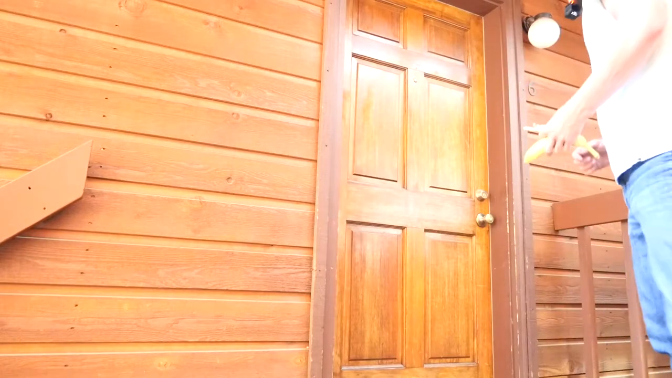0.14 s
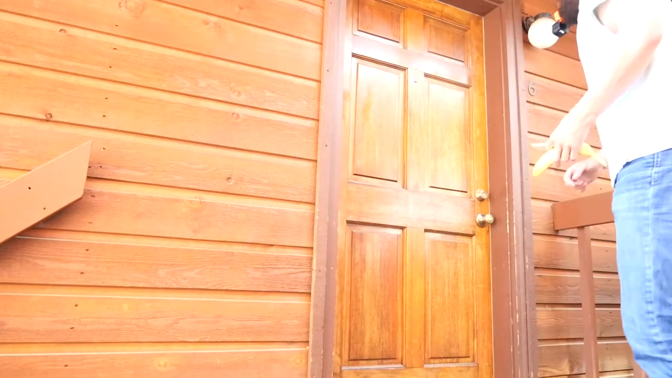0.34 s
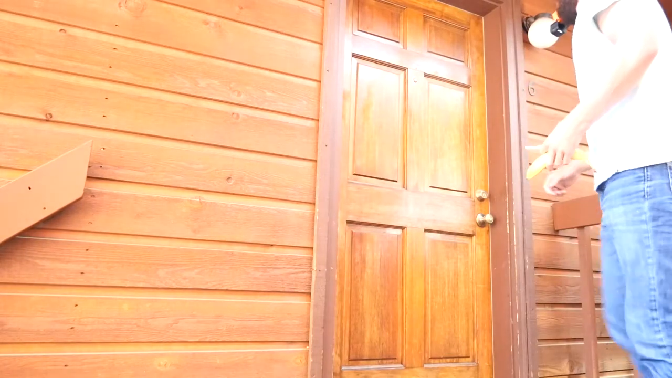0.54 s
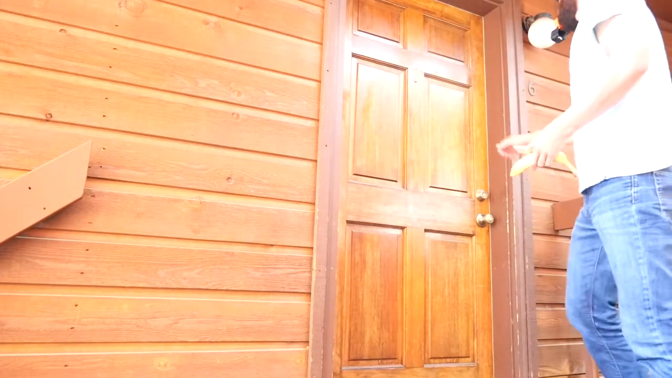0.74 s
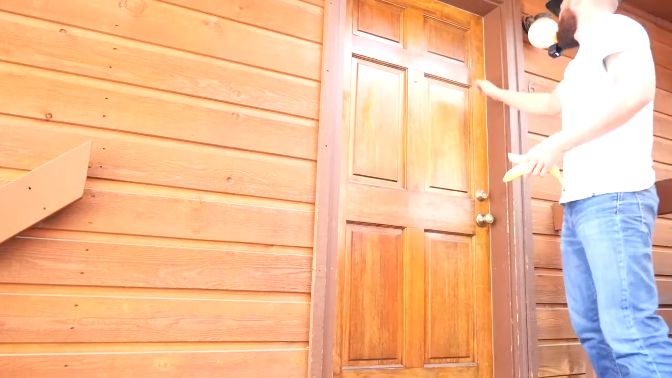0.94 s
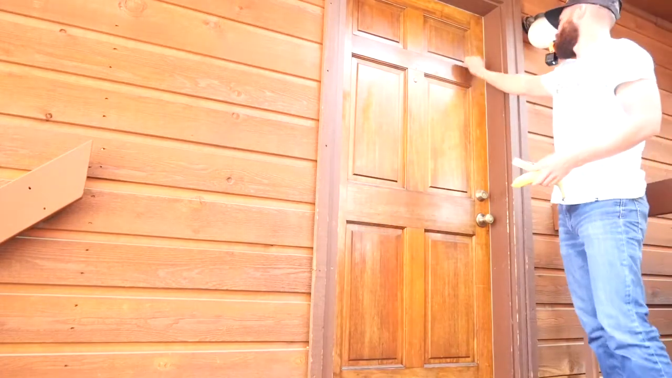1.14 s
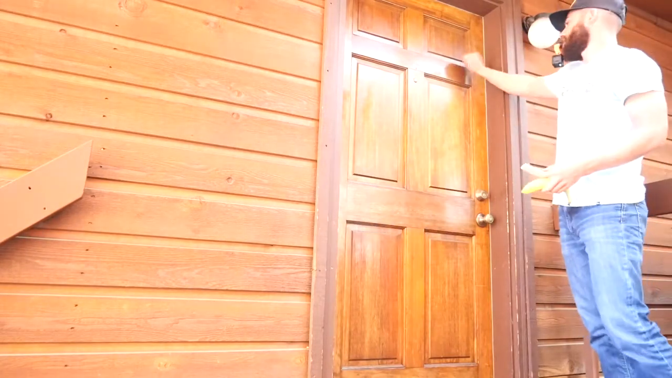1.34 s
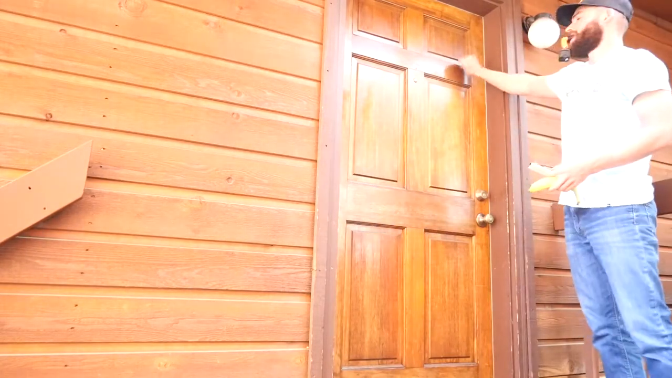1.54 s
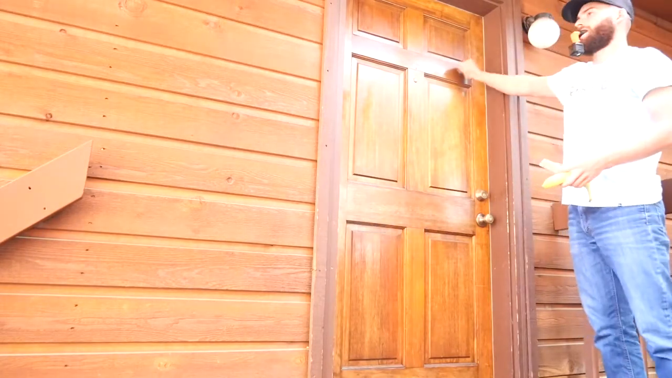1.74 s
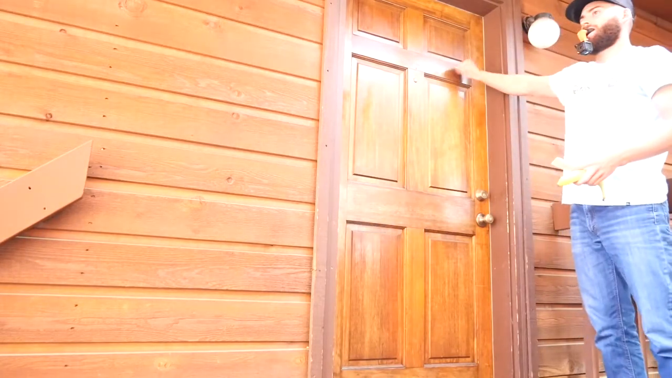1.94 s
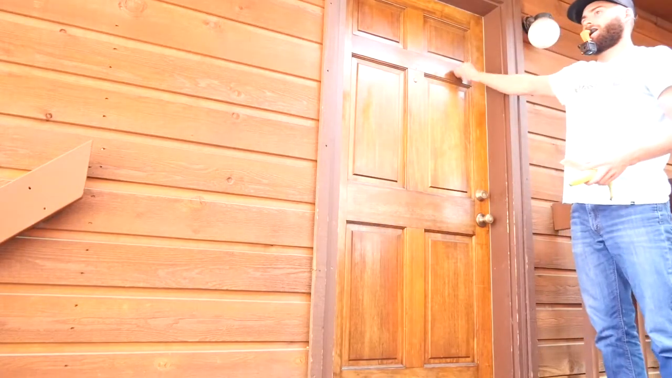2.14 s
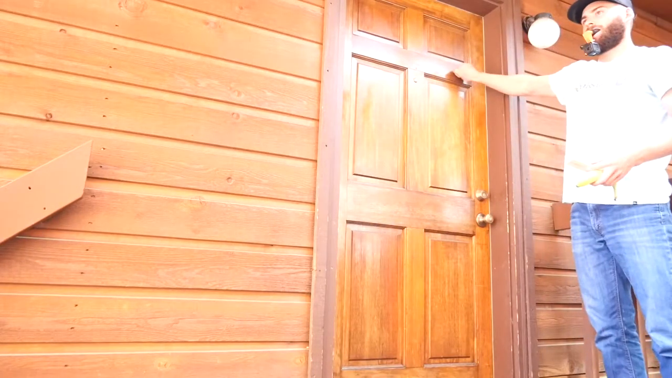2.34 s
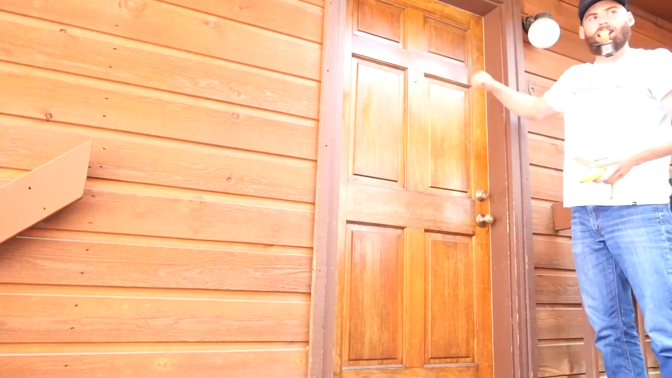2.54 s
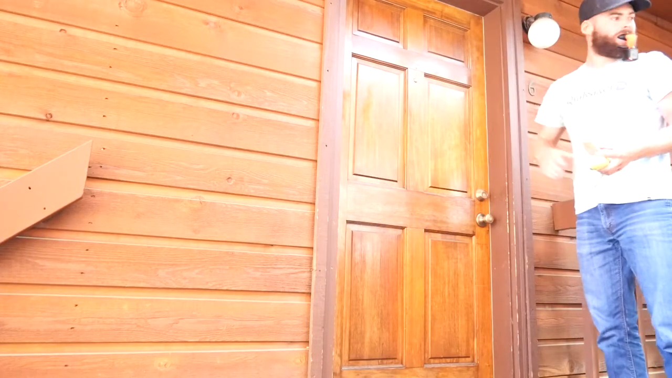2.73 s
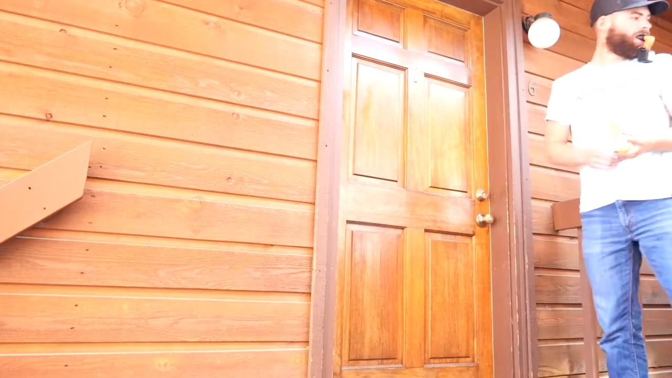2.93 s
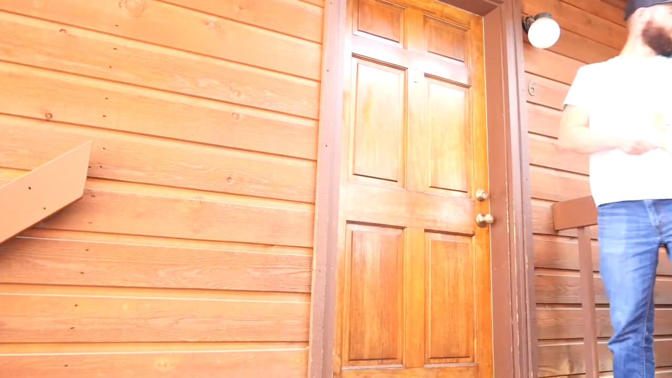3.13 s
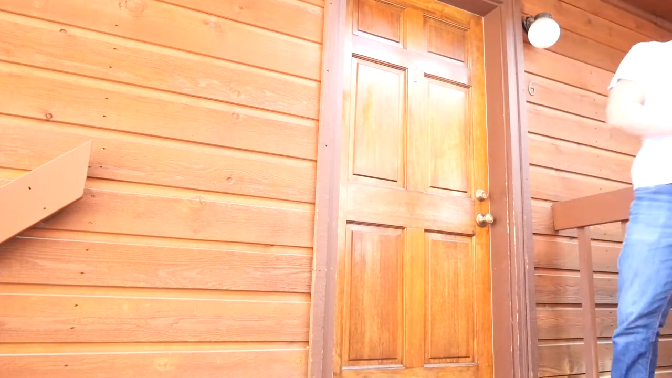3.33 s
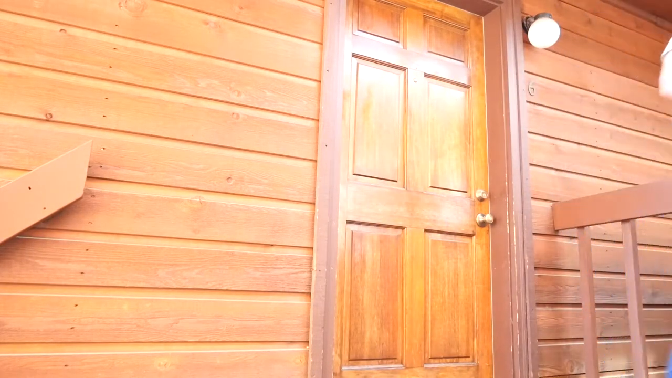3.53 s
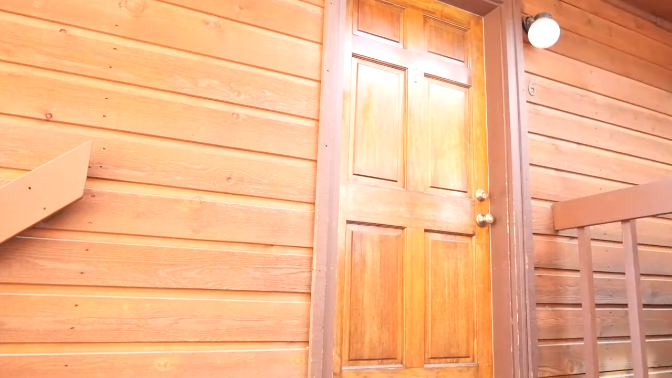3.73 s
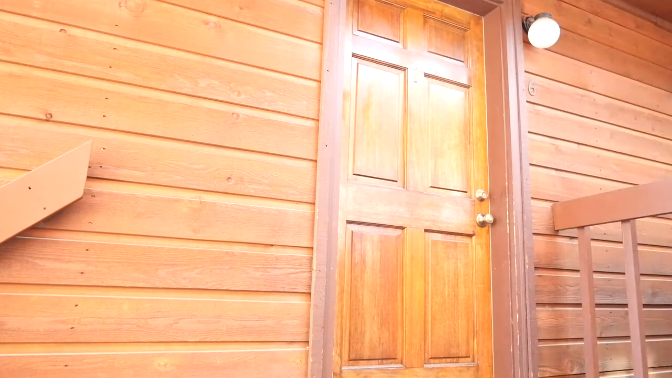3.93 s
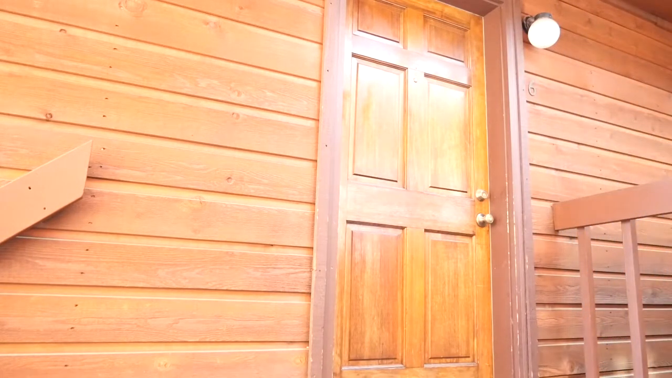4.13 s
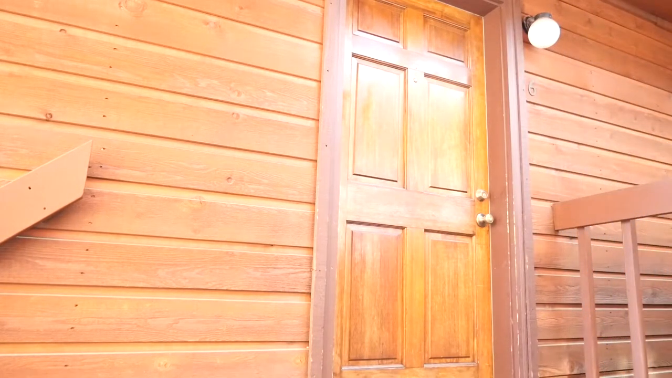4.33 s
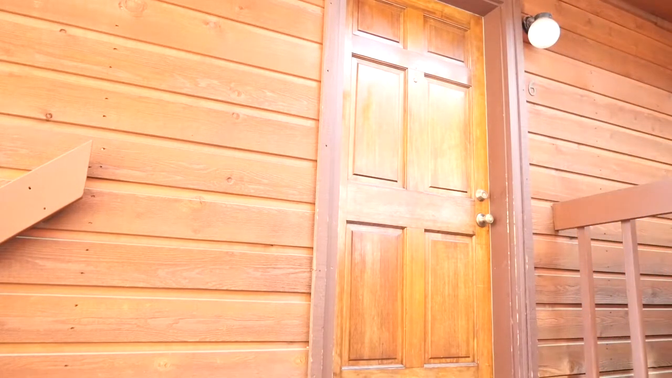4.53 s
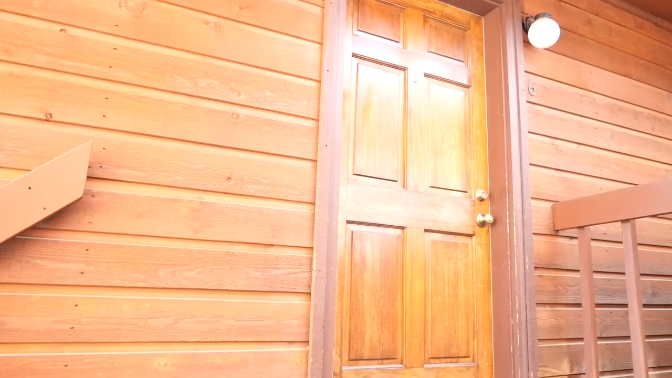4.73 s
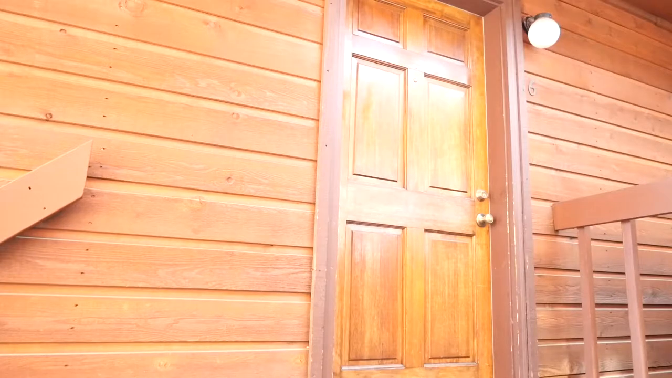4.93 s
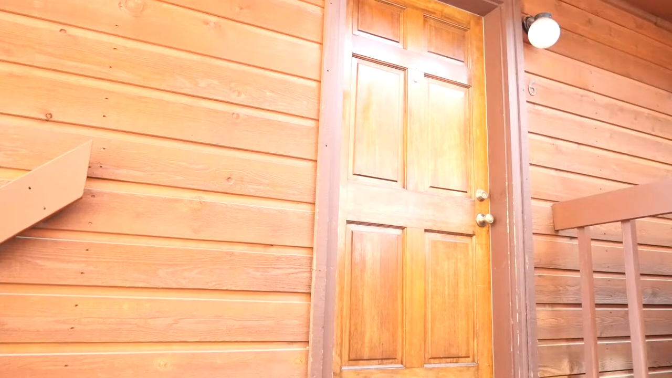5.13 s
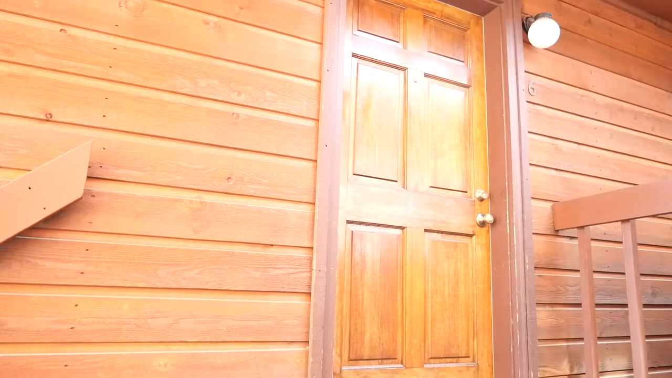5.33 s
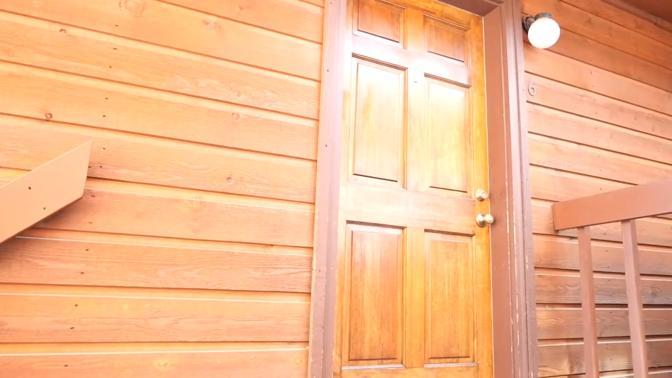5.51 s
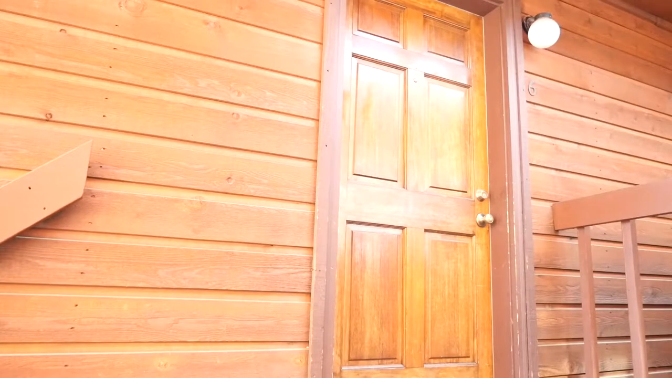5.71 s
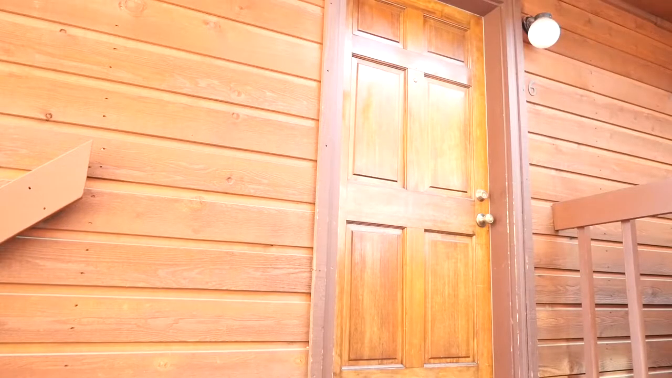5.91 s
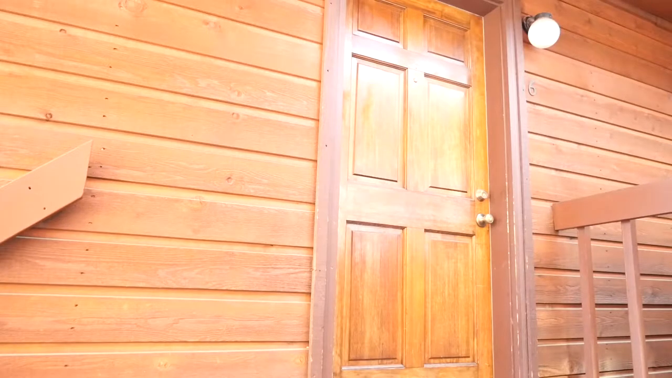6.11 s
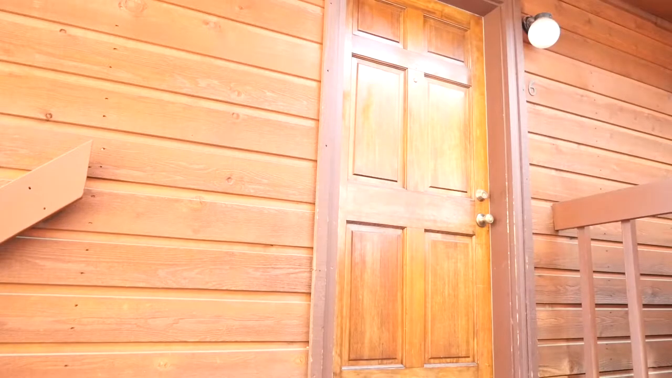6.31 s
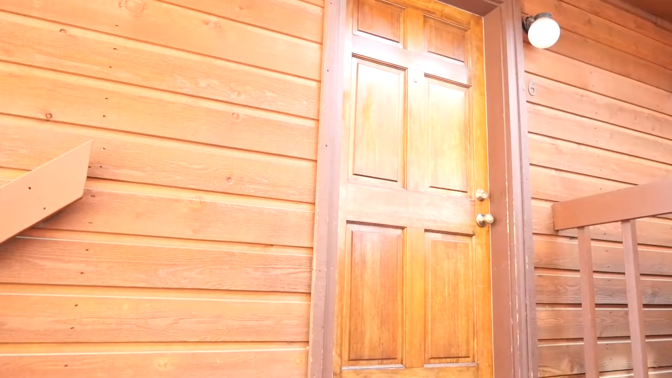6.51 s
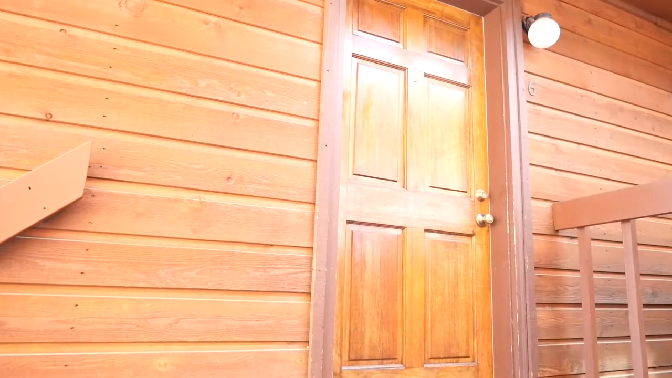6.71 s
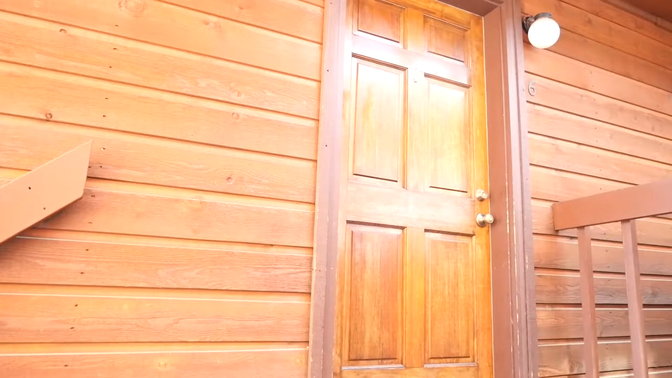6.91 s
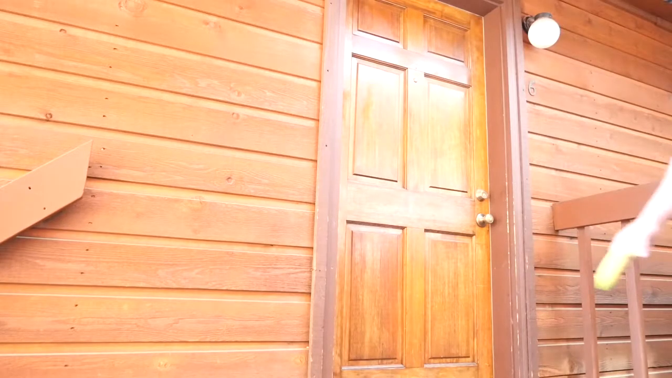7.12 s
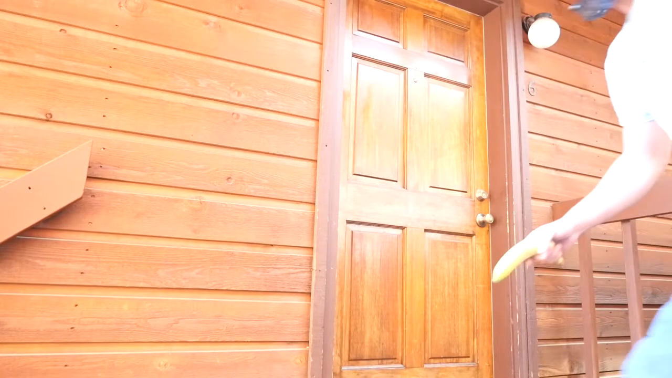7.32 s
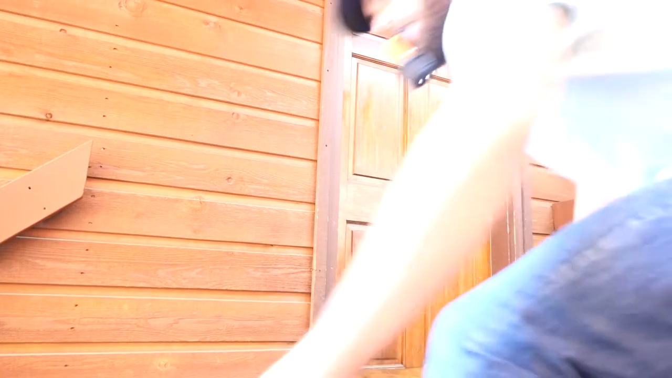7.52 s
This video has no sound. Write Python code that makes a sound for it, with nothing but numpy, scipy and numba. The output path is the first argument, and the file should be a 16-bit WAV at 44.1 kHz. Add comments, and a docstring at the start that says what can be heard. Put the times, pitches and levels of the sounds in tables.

```python
"""On a porch, over a far outdoor hush and a breeze rumbling on the microphone, a man steps up to a wooden door.
He knocks seven times: each blow shoves the door, rings the struck spot and spreads into the leaf.
He walks off, heel and toe on the boards; out of sight a hard thing cracks sharply, in a few quick contacts.
Something drops on the deck and slides to rest as filtered noise, then his steps come back.
The porch adds a short tail; the loudest blows overload the recorder and make its gain control duck the hush."""
import sys
import numpy as np
from scipy import signal
from scipy.fft import rfft, irfft
from scipy.io import wavfile
from numba import njit

SR = 44100
rng = np.random.default_rng(int(sys.argv[2]) if len(sys.argv) > 2 else 0)


def transcribe(signal):
    """Save signal, clipped to [-1, 1], as a 16-bit WAV file at the path in sys.argv[1]."""
    frames = np.atleast_2d(signal).T
    limited = np.clip(frames, -1, 1)
    pcm = np.round(limited * 32767).astype(np.int16)
    wavfile.write(sys.argv[1], SR, pcm)


N = 333396
CLOCK = np.arange(N) / SR  # time in the whole scene, s
RING_T = np.arange(2 ** 15) / SR  # time since the onset of a single sound, s
TOP_HZ = 15700  # upper edge of the recorded band


def amp(db):
    """Decibels to gain."""
    return 10 ** (np.asarray(db) / 20)


def unit(x):
    """Scale to rms 1."""
    return x / np.sqrt(np.mean(x ** 2))


def fade(t60):
    """Free decay, 60 dB down after t60 seconds."""
    return np.exp(-np.log(1000) * RING_T / t60)


def rise(seconds):
    """Contact builds up exponentially with this time constant."""
    return 1 - np.exp(-RING_T / seconds)


def hump(t, centre_s, width_s):
    """A smooth bell-shaped swell in time, top 1."""
    return np.exp(-.5 * ((t - centre_s) / width_s) ** 2)


def bell(hz, centre_hz, octaves):
    """A bump on the log-frequency axis, top 1."""
    return np.exp(-.5 * (np.log2((hz + 1) / centre_hz) / octaves) ** 2)


def add(track, s, sound):
    """Mix a sound into the track at time s."""
    i = max(int(s * SR), 0)
    track[i:i + len(sound)] += sound[:max(N - i, 0)]


def along(hz, rows):
    """Interpolate the columns of a table over log frequency."""
    knots, *columns = np.transpose(rows)
    return [np.interp(np.log(hz + 1), np.log(knots), column) for column in columns]


def noise(shape, size):
    """Random-phase noise of rms 1 whose spectrum follows shape(Hz)."""
    hz = np.fft.rfftfreq(size, 1 / SR)
    phases = np.exp(2j * np.pi * rng.random(len(hz)))
    return unit(irfft(shape(hz) * phases, size))


def hiss(centre_hz, octaves):
    """A stretch of noise in one broad resonance."""
    return noise(lambda hz: bell(hz, centre_hz, octaves), size=len(RING_T))


def catches():
    """Quick uneven grip of a rubbing contact, rms 1."""
    return hiss(80, 1.0)


def burst(rows, colour=lambda hz: 0):
    """Countless overlapping modes: coloured noise in which each octave dies at its own rate."""
    def shape(hz):
        return amp(along(hz, rows)[0] + colour(hz)) * (hz < TOP_HZ)

    spectrum = rfft(noise(shape, size=len(RING_T)))
    octave = np.log2(np.clip(np.fft.rfftfreq(len(RING_T), 1 / SR), 64, 16384))
    out = 0
    for centre in np.arange(6, 15):
        # triangular octave bands that overlap and sum to one
        band = irfft(spectrum * np.maximum(1 - abs(octave - centre), 0))
        out = out + band * fade(along(2. ** centre, rows)[1])
    return out


def tone(hz, t60):
    """One struck mode: a decaying sine."""
    return np.sin(2 * np.pi * hz * RING_T) * fade(t60)


def ring(modes, scatter_db=2.5):
    """Modes whose strength and sign vary at random, as they depend on where the blow lands."""
    out = 0
    for hz, db, t60 in modes:
        sign = rng.choice([-1, 1])
        out = out + sign * amp(db + scatter_db * rng.standard_normal()) * tone(hz, t60)
    return out


# far outdoor hush at the microphone: (f/Hz, relative level/dB per Hz)
HUSH = [(20, -8.5), (50, -10.5), (96, -14.5), (140, -5.5), (221, -13), (420, -16.5), (650, -19.5),
        (900, -12), (1020, -18), (1150, -23.5), (1620, -28), (2560, -35), (3700, -35), (4400, -43),
        (15500, -54.5)]
# puffs of breeze on the microphone: (t/s, level/dB at the peak)
GUSTS = [(.05, -52), (.52, -38), (6.07, -39), (6.8, -43.5), (7.351, -35), (7.55, -26)]


def outdoors(hush_db=-39, waver_db=-0.37, breeze_db=-53, gust_width_s=0.054):
    """A nearly steady far hush, and a light breeze rumbling on the microphone."""
    waver = noise(lambda hz: bell(hz, 5.8, 0.98), size=N)
    hush = noise(lambda hz: amp(along(hz, HUSH)[0]), size=N) * amp(hush_db + waver_db * waver)
    wind = amp(breeze_db) + sum(amp(db) * hump(CLOCK, s, gust_width_s) for s, db in GUSTS)
    rumble = noise(lambda hz: bell(hz, 32, 0.6), size=N)
    return hush + wind * rumble


# porch reverberation: (f/Hz, relative level/dB, t60/s)
PORCH = [(40, -2.5, 0.37), (300, 2, 0.56), (1000, 5, 0.43), (3100, 4, 0.36), (8200, 4, 0.37),
         (15000, 6.5, 0.25)]


def porch(sound, wet_db=-5, delay_s=0.0059):
    """Wall, roof and deck throw back a dense, short tail, different for every spot that sounds."""
    # the tail sets in at half the delay and is full at one and a half
    tail = burst(PORCH) * np.clip(RING_T / delay_s - .5, 0, 1)
    reflected = signal.fftconvolve(sound, tail / np.linalg.norm(tail))[:len(sound)]
    return sound + amp(wet_db) * reflected


def rub(rise_s, t60, rough_db=2.5):
    """Strength of a brushing contact: it swells, catches unevenly and dies away."""
    swell = np.minimum(RING_T / rise_s, 1)
    decay = np.exp(-np.log(1000) * np.maximum(RING_T - rise_s, 0) / t60)
    return swell * decay * amp(rough_db * catches())


# small hard contacts and grit: (t/s, level/dB, centre f/Hz, t60/s)
CLICKS = [(.073, -29.5, 4130, 0.062), (0.078, -33, 10000, .02), (.582, -17, 950, 0.043),
          (.805, -23, 2310, 0.054), (1.133, -37.5, 3600, 0.45), (1.310, -30.5, 3120, 0.074),
          (3.791, -25, 3920, 0.13), (3.853, -29.5, 3240, 0.11), (3.911, -3.5, 1550, 0.018),
          (3.9146, -1, 8000, 0.019), (3.9210, -3.5, 5030, 0.028), (3.947, -30.5, 4450, .33),
          (5.804, -36, 1900, .2), (6.134, -25, 1720, 0.07), (6.474, -40.5, 6500, .13),
          (7.172, -38.5, 1970, 0.057), (7.321, -29, 1500, 0.026)]
# soles and clothes brushing: (t/s, level/dB, centre f/Hz, t60/s after the swell)
RUSTLES = [(0.366, -36, 1200, .32), (0.364, -48.5, 7000, 0.29), (0.812, -43, 2150, 0.64),
           (0.953, -43.5, 2500, 0.39), (1.26, -49, 5500, .28), (3.10, -52, 2500, 0.61),
           (3.249, -42, 2270, 0.47), (3.72, -38, 5430, 0.45), (4.87, -51, 3010, 0.14),
           (5.169, -47, 2210, 0.31), (5.341, -47, 2210, 0.19), (6.186, -40.5, 2600, 0.14),
           (7.326, -45.5, 2820, 0.75)]


def handling(contact_s=0.00022, click_octaves=0.8, rustle_octaves=1, swell_share=.15):
    """Small clicks, and the brushing of soles and clothes, each a band of noise."""
    out = np.zeros(N)
    for s, db, hz, t60 in CLICKS:
        add(out, s, amp(db) * hiss(hz, click_octaves) * rise(contact_s) * fade(t60))
    for s, db, hz, t60 in RUSTLES:
        # the swell lasts a share of the dying away
        add(out, s, amp(db) * hiss(hz, rustle_octaves) * rub(swell_share * t60, t60))
    return out


# resonances of the sliding thing: (f/Hz, width/octaves, level/dB)
SLIDE = [(348, 0.42, -5.5), (850, 0.38, -0.5), (1760, 0.83, -5), (3110, 0.26, -2), (5900, 0.081, -7.5),
         (6600, 0.62, -5.5)]


def slide(start_s=4.05, length_s=0.34, slide_db=-28, rough_db=2.1):
    """The dropped thing scrapes over the boards, quieter as it slows evenly, and comes to rest."""
    out = np.zeros(N)
    scrape = sum(amp(db) * hiss(hz, octaves) for hz, octaves, db in SLIDE)
    speed = np.maximum(1 - RING_T / length_s, 0)
    # it bites harder once on the way
    bite_db = 7 * hump(start_s + RING_T, centre_s=4.157, width_s=0.018)
    grip_db = bite_db + rough_db * catches()
    sound = amp(slide_db + grip_db) * speed * rise(0.045) * scrape
    add(out, start_s, porch(sound, wet_db=-6))
    return out


def impacts(contacts, body, modes, modes_db, wet_db, build_s=0.00091, bass_hz=170):
    """Quick successive contacts ring the same modes; the hard object is too small to give off bass."""
    out = np.zeros(N)
    for s, db in contacts:
        blow = porch(rise(0.00078) * burst(body), wet_db)
        ringing = amp(modes_db) * rise(build_s) * ring(modes)
        add(out, s, amp(db) * (blow + ringing))
    return signal.sosfilt(signal.butter(2, bass_hz, "high", fs=SR, output="sos"), out)


# contacts of the thing that drops: (t/s, level/dB)
DROPS = [(3.9115, -0.5), (3.9410, -10.5)]
# its dense, short-lived vibration: (f/Hz, relative level/dB per Hz, t60/s)
DROP_BODY = [(40, -31, .1), (171, -15, 0.25), (370, 3, 0.092), (807, -1.5, 0.15), (1382, -8.5, 0.055),
             (2280, -7, 0.051), (4500, -26, 0.41), (15100, -38, .1)]
# its single modes: (f/Hz, relative level/dB, t60/s)
DROP_MODES = [(414, -1, 0.52), (434, -8, 0.51), (630, -2, 0.22), (735, -6, 0.29), (806, -1, 0.53),
              (810, 9.5, 0.078), (910, 0, 0.36), (3420, -23, 0.34), (3470, -15.5, .3)]


def drop():
    """Something lands on the deck in two contacts, each a body burst and ringing modes."""
    return impacts(DROPS, DROP_BODY, DROP_MODES, modes_db=-14, wet_db=-4.0)


# contacts of the hard thing that cracks out of sight: (t/s, level/dB)
CRACKS = [(3.4337, -20), (3.4390, 15), (3.4460, 8), (3.4520, 7)]
# its dense, short-lived vibration: (f/Hz, relative level/dB per Hz, t60/s)
CRACK_BODY = [(40, -29.5, .02), (300, -34, 0.032), (893, -13, .04), (2020, -10.5, 0.082),
              (3140, 5.5, 0.025), (4500, -9, 0.022), (8000, -6, 0.041), (15200, -20.5, 0.041)]
# its single modes: (f/Hz, relative level/dB, t60/s)
CRACK_MODES = [(2785, -9.5, .34), (2927, -3.5, .38), (2915, -6, 0.5), (2984, 13, 0.044), (3400, -14, .18),
               (4000, -22.5, .25), (7547, -23, .08)]


def crack():
    """A hard thing cracks in four contacts, each a bright body burst and ringing modes."""
    return impacts(CRACKS, CRACK_BODY, CRACK_MODES, modes_db=-17.5, wet_db=-9.0)


# dense vibration of the deck: (f/Hz, relative level/dB per Hz, t60/s)
DECK_WOOD = [(29.24, -16, .2), (120, -4.5, 0.14), (288, 0.5, 0.2), (537, -5, 0.14), (950, 2.5, 0.065),
             (1600, -14, 0.23), (3482, -16.5, 0.13), (6850, -32.5, 0.25), (15200, -54, .1)]


def tread(grit_db, board_hz, board_db, board_t60=0.14, grit_hz=1200, rattle_db=2):
    """A shoe thumps the deck, sounds the board under it and crushes a little grit; loose boards chatter."""
    # grit tilts the treble above grit_hz, up or down
    wood = burst(DECK_WOOD, lambda hz: grit_db * hz ** 2 / (hz ** 2 + grit_hz ** 2))
    thump = wood * amp(rattle_db * catches())
    return porch(thump, wet_db=-6) + amp(board_db) * tone(board_hz, board_t60)


# footfalls: (t/s, level/dB, grit level/dB, softness 0-1, board note f/Hz, its relative level/dB)
STEPS = [(.039, -22, -15.5, 0.1, 375, -24), (.449, -21, -10, 0, 316, 1), (.805, -20.5, 2, 0, 169, -6.5),
         (.971, -24.5, -20, 0.37, 208, 3.5), (2.625, -32, -27, 0.1, 274, -13),
         (3.087, -25, -11.5, 0.14, 437, -20), (3.652, -18, 10, 0.35, 327, -6.5),
         (4.725, -28, -15, 0.73, 447, 6.5), (4.895, -33, -30, 0.23, 309, -1),
         (5.225, -29, -4.5, 0.82, 381, -4), (5.700, -30, -8.5, 0, 352, -19),
         (6.135, -17, -7.5, 0.22, 278, 2), (6.471, -19, 2.5, 0.15, 279, 3),
         (6.561, -26.5, -11, 0.27, 295, 6), (6.721, -29.5, -6, .3, 522, -5.5),
         (6.760, -23, -16, 0.68, 279.4, -1.5), (6.940, -23.5, -18, .5, 194, -14),
         (6.977, -21.5, -15.5, 0.75, 362, -1), (7.299, -27.5, -7.5, 0, 503, 1.5),
         (7.321, -19, -16, 0.1, 163, -2), (7.362, -21.5, -14, 0.08, 294, 7),
         (7.443, -33.5, -6, 0.2, 296, 13)]


def steps(heel_rise_s=0.00033, roll_rise_s=.009, toe_lag_s=.042, toe_rise_s=0.0076):
    """Every footfall lands on the heel and rolls onto the toe, on the same board."""
    out = np.zeros(N)
    for s, db, grit_db, softness, board_hz, board_db in STEPS:
        # a soft step builds up slowly and leaves more weight for the toe
        soft = np.clip(softness, 0, 1)
        toe_db = -12 + 14.5 * soft
        heel = rise(heel_rise_s + soft * roll_rise_s) * tread(grit_db, board_hz, board_db)
        toe = rise(toe_rise_s) * tread(grit_db, board_hz, board_db)
        add(out, s, amp(db) * heel)
        add(out, s + toe_lag_s, amp(db + toe_db) * toe)
    return out


# knuckle blows: (t/s, level/dB, struck-spot f/Hz, its relative level/dB,
#                 panel range favoured or missed f/Hz, its boost or cut/dB, knuckle crack f/Hz)
KNOCKS = [(1.161, 2, 400, -1, 272, 19.5, 3200), (1.3663, 2, 891, 4, 195, 10.5, 2780),
          (1.56, 3, 890, 2.5, 335, 18, 1650), (1.753, 3.5, 1346, -2.5, 640, 4, 2080),
          (1.9552, 4.5, 1082, -0.5, 760, 1, 1500), (2.1471, 3, 983, 6.5, 740, -8, 1620),
          (2.3319, 2.5, 1100, 1.5, 190, 7, 1700)]
# door leaf and panels: (f/Hz, relative level/dB, t60/s)
DOOR_MODES = [(34.2, -6, 0.89), (62, -26, .4), (95, 3, 0.31), (130.8, -9, 0.24), (177.5, -1, 0.36),
              (253, 6.5, 0.26), (335, -7, 0.32), (382, -32.5, .4), (426, 15, 0.11), (542, 7, 0.18),
              (620, 10.5, 0.21), (653, -3.5, 0.65), (782, 2, 0.47), (834, 4, 0.32), (919, 11.5, 0.2),
              (960, -29, 0.55), (1042, -4.5, 0.45), (1067, 1.5, 0.31), (1220, -4.5, 0.47), (1285, -35, .3),
              (1753, -30, .23)]
# dense, short-lived vibration of the door: (f/Hz, relative level/dB per Hz, t60/s)
DOOR_WOOD = [(30, -16, 0.097), (119.3, 2.5, 0.091), (282, -12, 0.11), (550, -0.5, 0.22), (964, 0, 0.076),
             (1764, -10, 0.067), (2480, -17.5, 0.027), (3520, -13, 0.017), (8100, -45, 0.098),
             (15000, -46, .04)]


def knocks(push_db=1, push_s=0.0014, spot_db=2, spot_t60=0.027, wood_db=-5, modes_db=-27.0):
    """Each blow shoves the door, rings the struck spot hard and spreads into the whole leaf."""
    out = np.zeros(N)
    push = amp(push_db) * np.sin(np.pi * np.minimum(RING_T / push_s, 1))
    for s, db, spot_hz, ring_db, panel_hz, panel_db, knuckle_hz in KNOCKS:
        # the fist lands more bonily as the run goes on: 8.5 dB per second
        knuckle_db = 3 + 8.5 * (s - KNOCKS[0][0])

        def colour(hz):
            """Where and how bonily the fist lands colours the wood."""
            return panel_db * bell(hz, panel_hz, 0.25) + knuckle_db * bell(hz, knuckle_hz, .42)

        wood = amp(wood_db) * burst(DOOR_WOOD, colour)
        spot = amp(spot_db + ring_db) * tone(spot_hz, spot_t60)
        blow = push + rise(0.00092) * (spot + wood)
        leaf = amp(modes_db) * rise(0.0018) * ring(DOOR_MODES)
        add(out, s, amp(db) * (porch(blow, wet_db=-10.0) + leaf))
    return out


def scene():
    """Everything on the porch, over the outdoor hush."""
    background = outdoors() + porch(handling())
    out_of_sight = slide() + drop() + crack()
    return (background + out_of_sight + steps() + knocks())[None]


@njit
def follow(excess, attack, release):
    """Rises quickly toward any excess and lets go slowly."""
    out, held = np.empty(len(excess)), 0.
    for i in range(len(excess)):
        held += (excess[i] - held) * (attack if excess[i] > held else release)
        out[i] = held
    return out


def record(dry, limit_db=2, attack_s=0.00085, release_s=0.23):
    """Gain control ducks after the loudest blows, too late to keep their fronts from clipping."""
    excess_db = np.maximum(20 * np.log10(abs(dry[0]) + 1e-9) - limit_db, 0)
    duck_db = follow(excess_db, 1 / (attack_s * SR), 1 / (release_s * SR))
    clipped = np.clip(dry * amp(-duck_db), -1, 1)
    # steep cut above the recorded band
    return signal.sosfilt(signal.ellip(10, .1, 80, TOP_HZ, fs=SR, output="sos"), clipped)


dry = scene()
out = record(dry)
transcribe(out)
```